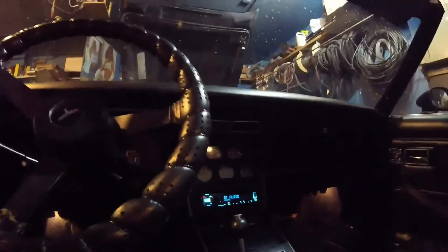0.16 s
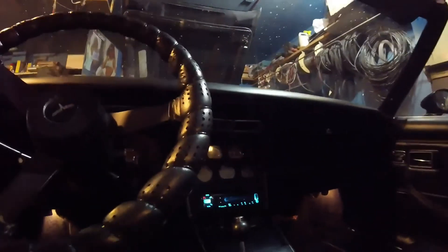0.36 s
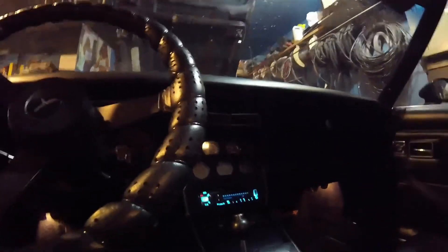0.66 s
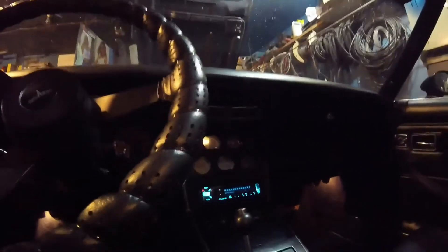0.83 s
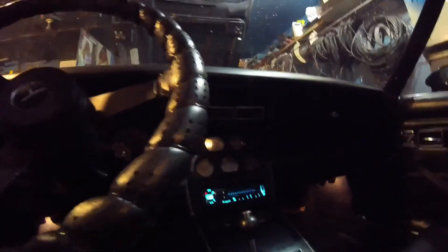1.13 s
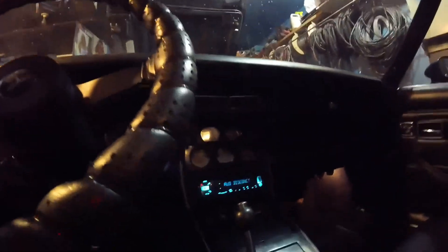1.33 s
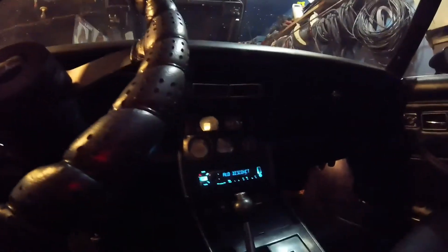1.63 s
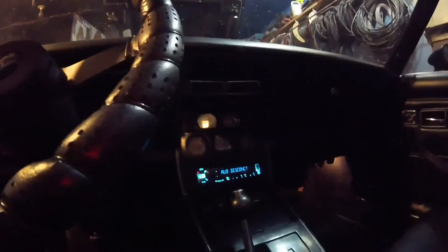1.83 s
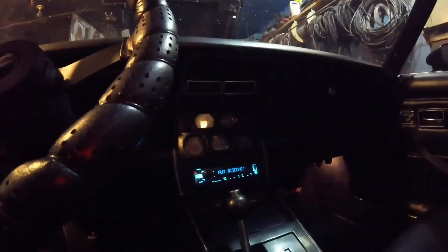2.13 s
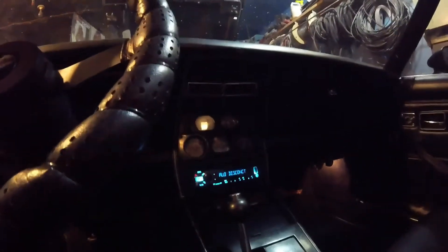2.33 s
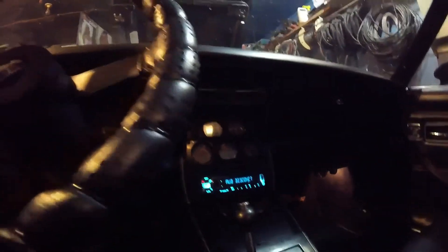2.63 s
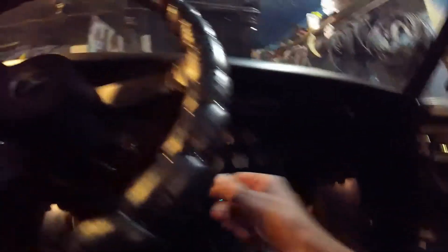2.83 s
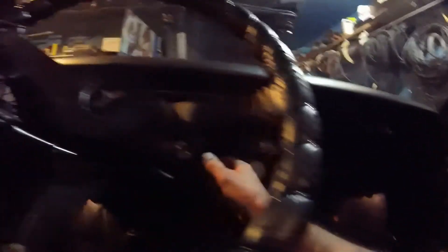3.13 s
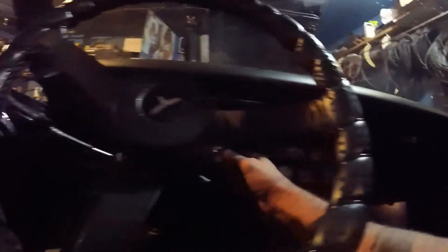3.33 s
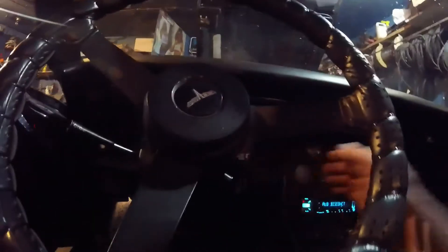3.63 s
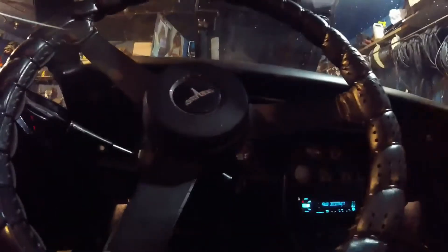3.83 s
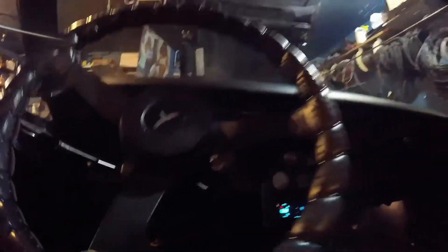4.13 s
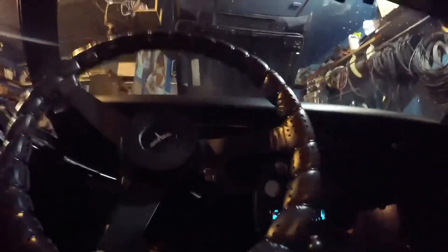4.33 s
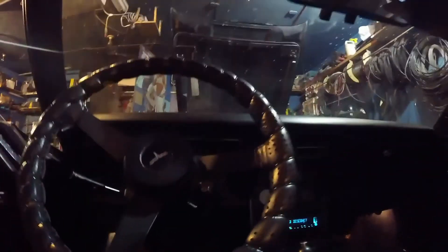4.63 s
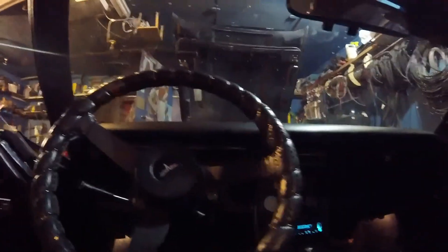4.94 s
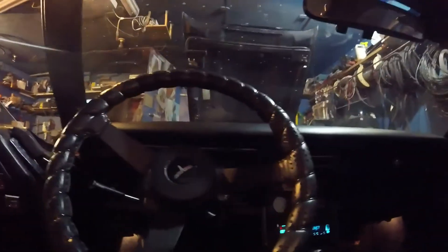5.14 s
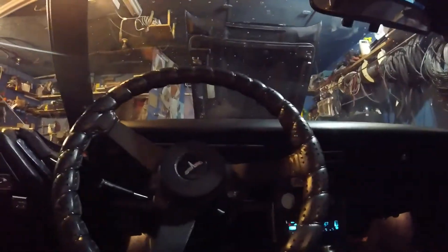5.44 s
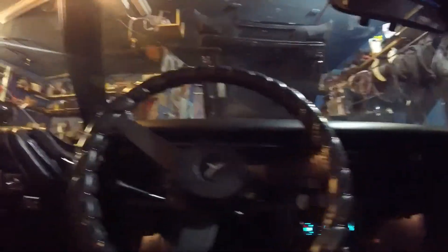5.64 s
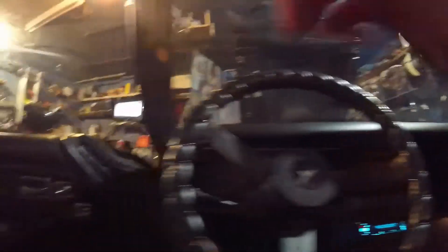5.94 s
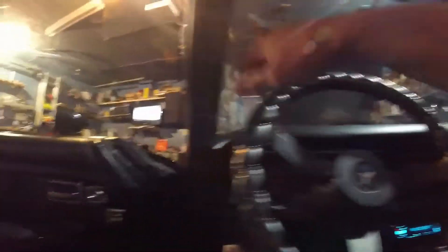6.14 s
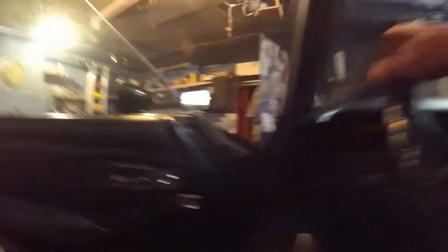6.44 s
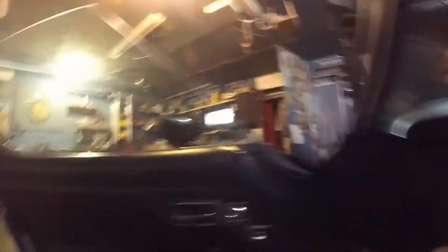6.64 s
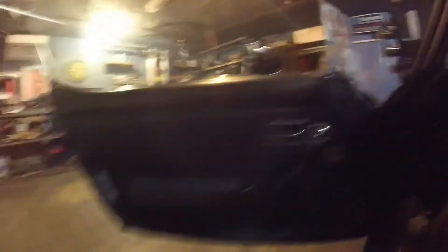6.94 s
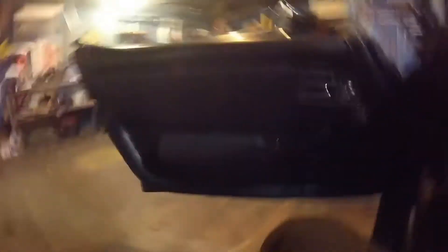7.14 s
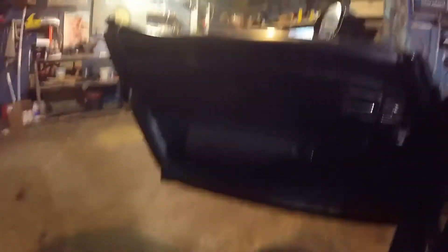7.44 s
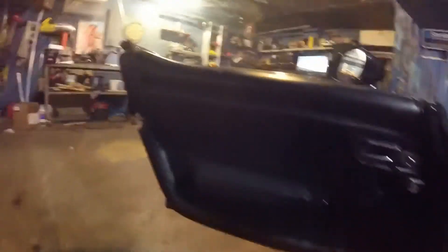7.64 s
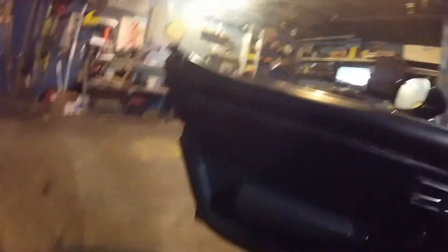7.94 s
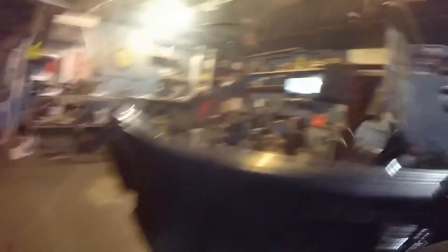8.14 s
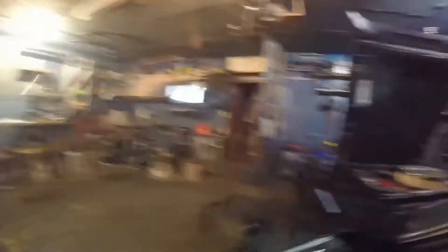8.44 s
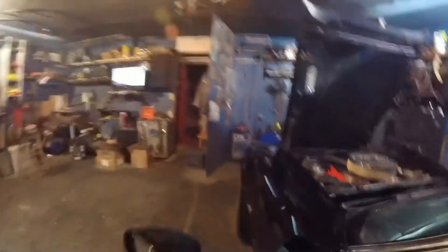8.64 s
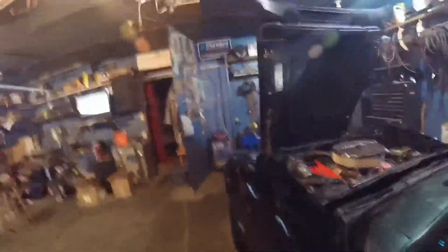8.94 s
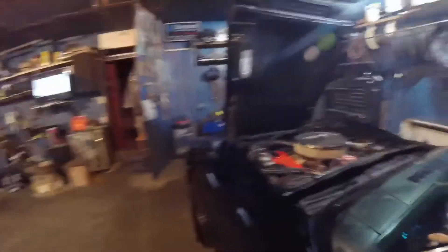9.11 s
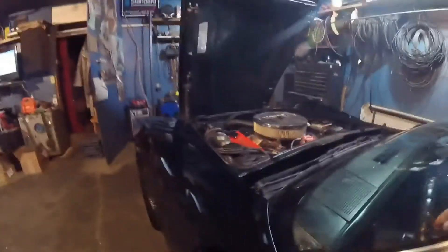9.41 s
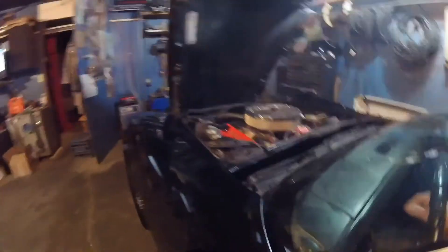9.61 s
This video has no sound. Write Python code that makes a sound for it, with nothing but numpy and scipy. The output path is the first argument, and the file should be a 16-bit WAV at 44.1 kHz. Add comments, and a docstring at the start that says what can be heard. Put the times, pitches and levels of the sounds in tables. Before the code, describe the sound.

Steady low engine rumble with uneven misfiring throbs booms in a car cabin, then gives way to rushing fan noise as the listener climbs out.

```python
"""Cold V8 at fast idle

A cold V8 runs at about 1320 rpm in a garage, heard first from the driver's seat, where the firing rate booms.
In spells one cylinder misses on every other cycle: the boom, a sine at the firing rate, lopes and the body thumps.
Random pulses, one per firing, rumble under sine exhaust orders; shaped noise makes the block, fan and carburettor.
The microphone works its way out past the open door; near the end the boom falls away and the fan grows."""
import sys
import numpy as np
from scipy import signal
from scipy.fft import rfft, irfft, next_fast_len
from scipy.io import wavfile
from scipy.ndimage import uniform_filter1d, minimum_filter1d

SR = 44100
rng = np.random.default_rng(int(sys.argv[2]) if len(sys.argv) > 2 else 0)


def file_out(sig):
    """Save sig as 16-bit WAV at sys.argv[1]."""
    # one column per channel
    cols = np.atleast_2d(sig).T
    # limit, then scale
    lim = np.clip(cols, -1, 1)
    pcm = np.round(lim * 32767).astype(np.int16)
    wavfile.write(sys.argv[1], SR, pcm)


N = 430857

# Levels below are taken before the trims in the functions; responses are relative, as their output is set to rms 1.
# Engine speed, hunting up and down and sinking a little: start_s, firing_rate_hz
SPEED_CURVE = [(0.0, 88.6), (0.4, 90.2), (0.7, 90.4), (1.0, 89.1), (1.2, 91.0), (1.45, 87.3), (1.8, 90.8),
               (2.1, 88.6), (2.35, 88.3), (2.8, 90.3), (3.0, 87.3), (3.15, 89.8), (3.35, 87.5), (3.6, 90.2),
               (3.8, 88.2), (4.1, 88.2), (4.33, 86.3), (4.55, 89.0), (4.8, 89.4), (4.95, 86.6), (5.2, 87.2),
               (5.45, 90.0), (5.72, 85.4), (6.25, 88.6), (6.55, 88.5), (6.85, 85.7), (7.05, 88.2),
               (7.25, 86.8), (7.6, 88.8), (7.9, 86.6), (8.2, 87.4), (8.35, 85.7), (8.6, 86.7), (9.0, 85.7),
               (9.6, 87.4), (9.77, 87.0)]
# Way out of the car (0 seat, 1/3 door sill, 2/3 behind the open door, 1 engine bay): start_s, way_out_0_to_1
MIC_PATH = [(0, 0), (3, 0), (5, 0.2), (6.5, 0.33), (7.2, 0.8), (8.2, 0.69), (8.7, 0.84), (9.3, 0.95)]
# Strength of each cylinder's pulse, in firing order: level_db
CYLINDER_LEVELS = [-7, -5, -5, -7, -8.5, -6, -3.5, -7]
FIRST_CYLINDER = 6  # place in the firing order at the start

# Brief swells in the midrange rush: peak_s, length_s, centre_hz, width_hz, level_db
RUSH_SWELLS = [(0.3, 0.89, 1307, 160, -43.5), (0.7, 1.5, 412, 25, -44), (5.92, 0.25, 1250, 300, -41),
               (6.135, 0.07, 380, 150, -35), (6.25, 0.37, 515, 45, -38), (6.563, 0.074, 1420, 200, -41.5),
               (6.704, 0.13, 650, 800, -34), (6.915, 0.12, 1380, 300, -39.5), (8.52, 0.15, 450, 400, -41),
               (9.686, 0.11, 1260, 350, -33)]
# Rush from the engine bay; the hiss follows the fan: start_s, fan_db, air_cleaner_db
BAY_LEVELS = [(0, -34, -49), (0.25, -38.5, -43), (1.1, -39, -43.5), (1.45, -41, -43.5), (3, -42, -45.5),
              (4.1, -40, -44.5), (4.7, -38.5, -42.5), (6.8, -37.5, -40.5), (7.2, -40.5, -41.5),
              (8.2, -40, -46.5), (9.1, -34, -38), (9.77, -31, -33.5)]
# Tone of fan and belts: pitch_hz, cabin_db, outside_db
FAN_RESPONSE = [(200, -3.5, -5), (716, 1.5, 3.5), (950, 5.5, 0), (1500, 1.5, 2), (1890, -1.5, 0),
                (2240, 0, 1), (3080, -4, -3), (4420, -7.5, -6.7), (5600, -9.5, -7), (6050, -12, -11),
                (6870, -11.5, -12.5), (7900, -18, -18), (8870, -20, -20), (12200, -37.5, -38.5)]
# Narrow air cleaner resonances: pitch_hz, width_hz (of one filter pass), level_db
CLEANER_RESONANCES = [(1148, 168, 7), (1250, 200, 6.5)]
CARBURETTOR_HZ, CARBURETTOR_WIDTH_HZ = 6520, 440
HUNT_RUSH_DB_PER_HZ = 0.1  # the bay gets louder and softer as the idle hunts
# Thud of the block: start_s, level_db
BLOCK_LEVEL = [(0, -32), (1.5, -36), (2.8, -37.5), (5.3, -33.5), (6.7, -35.5), (7.3, -36), (8.2, -35),
               (8.5, -31.5), (9.77, -28.5)]
# Ring of block and bonnet: pitch_hz, seat_db, sill_db, behind_door_db, bay_db
BLOCK_RESPONSE = [(150, -7, -6, -11, -17), (218, -1, -1, 3.5, 0.5), (267, 4, 3.5, 0, 8),
                  (310, -4.5, -1.5, -6, 4.5), (352, 2, 3.5, 1, 3), (398, -1, 1, -4, 1),
                  (460, -2, -3.5, 4, 0.5), (533, 2.5, 1, -2.5, -5), (606, -3, -5.5, -2, -7),
                  (700, -6, -6.5, -7.5, -2), (855, -13, -11.5, -8, -10), (1490, -18, -15.5, -18.5, -22),
                  (5000, -54, -56.5, -56, -62)]

# Half-rate drone, where the two banks alternate: start_s, level_db
DRONE_LEVEL = [(0, -34), (0.55, -20), (0.9, -28), (1.45, -21), (2.0, -29.5), (2.65, -20), (2.8, -31),
               (3.3, -24.5), (4.4, -21), (4.55, -28), (4.75, -26), (5.2, -34), (6.6, -29.5), (7.2, -39),
               (9.77, -40.5)]
# Misses of a cold cylinder, often on every other cycle: dip_s, boom_lost_0_to_1, thump_db
MISS_EVENTS = [(0.09, 0.1, -11), (0.225, .45, -26), (0.445, 0.67, -6), (0.585, 0.4, -24), (0.77, 0.77, -20),
               (0.951, 0.3, -24), (1.115, 0.66, -24), (1.309, 0.73, -16), (1.736, .4, -24),
               (1.916, 0.27, -25), (2.227, 0.2, -10), (2.588, 0.3, -12), (2.856, 0.35, -14),
               (3.17, .75, -25), (3.359, 0.53, -16), (3.532, 0.8, -29), (3.718, 0.57, -13),
               (3.899, 0.63, -22), (4.04, 0.47, -15), (4.215, 0.52, -15), (4.466, 0.4, -26),
               (4.571, 0.74, -13), (4.819, 0.6, -22), (4.925, 0.3, -11), (5.11, 0.4, -21),
               (5.37, 0.65, -22), (5.54, 0.4, -22), (5.691, 0.1, -13), (5.959, 0.76, -14),
               (6.174, 0.75, -17), (6.369, 0.8, -16), (6.748, 0.16, -19), (6.847, 0, -26), (7.033, 0, -25),
               (7.217, 0.33, -26), (7.47, .65, -26), (7.641, 0.33, -24), (7.805, 0.57, -26),
               (8.008, 0.47, -29), (8.196, 0.58, -26), (8.396, 0.34, -26), (8.56, 0.5, -30)]
SAG_S = 0.028  # half the length of the dip that a miss leaves in the boom
# The body rocks just before the boom is weakest
THUMP_HZ, THUMP_RISE_S, THUMP_LEAD_S = 40.7, 0.011, 0.014
MISS_SCATTER = 0.063  # typical share of the boom by which a cycle differs

# Shudder of the car body: start_s, level_db
SHUDDER_LEVEL = [(0, -15), (1.3, -16.5), (2, -26), (3.0, -20), (3.9, -21), (4.7, -12), (5.3, -14.5),
                 (6.5, -13.5), (7.2, -21.5), (8.6, -23.5), (9.2, -17), (9.77, -17.5)]
# Car body, an even rumble in the open garage: pitch_hz, cabin_db, outside_db
BODY_RESPONSE = [(10, -19.5, -15), (19, -3, 3), (30, 2, 5.5), (43, 7.5, 2.5), (56, 1, 7), (75, -20, 1.5),
                 (200, -76.5, -46), (1000, -120, -110)]
# Cabin air driven by uneven firings: pitch_hz, level_db
CABIN_RESPONSE = [(45, -27.5), (58, -10), (66, 3), (74, 9.5), (84, 5.5), (92, -10), (100, -10), (125, -22),
                  (300, -75)]
CABIN_DB = -13.6  # below the smoothed boom level
# Throb of the exhaust pipes: start_s, level_db
THROB_LEVEL = [(0, -26.5), (1.5, -28.5), (2.8, -29.5), (5.3, -26.5), (6.1, -27), (6.7, -23.5), (8.7, -29.5),
               (9.77, -26)]
# Exhaust pipes: pitch_hz, seat_db, sill_db, behind_door_db, bay_db
PIPE_RESPONSE = [(70, -32, -33.5, -29, -29), (103, -2.5, -3, -4, -4), (119, 1, -0.5, 3.5, 3),
                 (152, 4, 5.5, 6, 3), (176, -3, 0, 3.5, -0.5), (209.6, -0.5, -1, -5, 0),
                 (220, -21, -18.5, -15, -16), (398, -31, -32.5, -31, -40), (1000, -65, -64, -66.5, -67)]
# Exhaust lines, relative to the throb: multiple_of_cycle (eight firings), seat_db, sill_db, behind_door_db, bay_db
EXHAUST_ORDERS = [(2, -11.5, -10.5, -17, -14), (3, -8, -5.5, -9, -2.5), (6, 6.5, 2.5, 4.5, -5.5),
                  (7, 5, 2, 0.5, -2), (9, -16, -12, -6.5, 2), (10, 1, 5, 0, 12), (13, -2, 0.5, -2.5, -3),
                  (14, -11, -5.5, -7, 5.5), (16, -3.5, -8.5, -10, -18), (18, -1.5, -8.5, -16, -15),
                  (21, -17.5, -20.5, -20, -21), (24, -9.5, -13, -23.5, -11), (26, -22, -18, -27, -6.5),
                  (29, -24, -23, -21, -8), (33, -20.5, -14.5, -19, -18), (37, -14, -17, -26, -16),
                  (45, -22, -22, -21.5, -16), (47, -20, -22, -26.5, -20)]
# Boom of the firing rate: start_s, level_db
BOOM_LEVEL = [(0.0, -11), (1.6, -10.5), (2.15, -10), (2.9, -13), (4.1, -10), (4.8, -13), (5.5, -12),
              (6.1, -12), (6.9, -11.5), (8.2, -8.5), (8.55, -13), (8.85, -25), (9.5, -27), (9.77, -27)]

LOW_CUT_HZ, TOP_HZ = 6, 12000  # range of the microphone


def undb(db):
    """Decibels to gain."""
    return 10 ** (np.asarray(db) / 20)


def unit(x):
    """Scale to rms 1."""
    return x / np.sqrt(np.mean(x ** 2))


def curves(table):
    """Each column of a time table, sample by sample."""
    s, *columns = np.transpose(table)
    return [np.interp(np.arange(N) / SR, s, column) for column in columns]


def walk(rate_hz):
    """Random levels, each held for 1 / rate_hz seconds and slewed twice; rms 1."""
    hold = int(SR / rate_hz)
    held = np.repeat(rng.standard_normal(N // hold + 1), hold)
    slewed = uniform_filter1d(uniform_filter1d(held, hold), hold)
    return unit(slewed[:N])


def colour(x, points):
    """Shape the spectrum of x by a response of (Hz, dB) points; rms 1."""
    hz, db = np.transpose(points)
    size = next_fast_len(N + SR)
    f = np.maximum(np.fft.rfftfreq(size, 1 / SR), 1)
    gain = undb(np.interp(np.log(f), np.log(hz), db))
    return unit(irfft(rfft(x, size) * gain, size)[:N])


def heard(x, table, outside):
    """Crossfade from one place's response to the next as the microphone leaves the car."""
    table = np.array(table)
    shares = np.eye(table.shape[1] - 1)
    places = np.linspace(0, 1, len(shares))
    out = np.zeros(N)
    for k, share in enumerate(shares):
        out += np.interp(outside, places, share) * colour(x, table[:, [0, k + 1]])
    return out


def resonance(x, hz, width_hz):
    """A band-pass resonance applied twice, for steep skirts; rms 1."""
    b, a = signal.iirpeak(hz, hz / width_hz, fs=SR)
    return unit(signal.lfilter(b, a, signal.lfilter(b, a, x)))


def scatter(count=1024):
    """One random value for each firing or cycle."""
    return rng.standard_normal(count)


def uneven_pulses(firings):
    """Each firing's random departure from the average, as a single-sample pulse."""
    at = np.flatnonzero(np.diff(np.floor(firings)))
    out = np.zeros(N)
    out[at] = scatter()[:len(at)]
    return out


def puffs(firings, decay, steady, scatter_db):
    """Noise that surges at each firing and decays over a share of the period, on a steady part."""
    index = firings.astype(int)
    cylinder_db = np.array(CYLINDER_LEVELS)[index % len(CYLINDER_LEVELS)]
    size = undb(cylinder_db + scatter_db * scatter()[index])
    surge = size * np.exp(-(firings % 1) / decay)
    return rng.standard_normal(N) * (steady + surge)


def swells():
    """Bands of noise rise and sink briefly in the midrange of the rush."""
    t = np.arange(N) / SR
    out = np.zeros(N)
    for s, length, hz, width, db in RUSH_SWELLS:
        envelope = np.exp(-(2 * (t - s) / length) ** 2)
        out += resonance(rng.standard_normal(N), hz, width) * undb(db) * envelope
    return out


def fan(firings, outside):
    """Fan and belts push out a broad rush of air that pulses only slightly with the firings."""
    return heard(puffs(firings, decay=1.2, steady=3.2, scatter_db=3.5), FAN_RESPONSE, outside)


def carburettor(firings, flutter_db):
    """Air squeezes past the nearly shut throttle plates in a narrow hiss."""
    suction = puffs(firings, decay=0.82, steady=0.9, scatter_db=5.0) * undb(flutter_db * walk(11))
    return resonance(suction, CARBURETTOR_HZ, CARBURETTOR_WIDTH_HZ)


def air_cleaner(firings, flutter_db):
    """Each intake stroke rings the fluttering resonances of the air cleaner."""
    intake = puffs(firings, decay=0.9, steady=1.6, scatter_db=2.5)
    out = np.zeros(N)
    for hz, width, db in CLEANER_RESONANCES:
        out += undb(db + flutter_db * walk(11)) * resonance(intake, hz, width)
    return unit(out)


def block(firings, outside):
    """Each firing thuds through the block and bonnet."""
    return heard(puffs(firings, decay=1.0, steady=0.78, scatter_db=5.0), BLOCK_RESPONSE, outside)


def engine_bay(firings, outside, block_db=-0.5, fan_db=1.03, cleaner_db=-1.0, hiss_db=-16,
               flutter_db=1.1, draught_db=0.52):
    """Fan rush and carburettor hiss waver as one draught beside the air cleaner and the block."""
    fan_level, cleaner_level = curves(BAY_LEVELS)
    block_level, = curves(BLOCK_LEVEL)
    air = undb(fan_db) * fan(firings, outside) + undb(hiss_db) * carburettor(firings, flutter_db)
    air *= undb(fan_level + draught_db * walk(9))
    cleaner = undb(cleaner_level + cleaner_db) * air_cleaner(firings, flutter_db)
    thud = undb(block_level + block_db) * block(firings, outside)
    return air + cleaner + thud


def drone(firings, lumpy_db=2.5):
    """The two banks alternate in a half-rate sine that comes in uneven lumps."""
    level, = curves(DRONE_LEVEL)
    return np.sqrt(2) * np.sin(np.pi * firings) * undb(level + lumpy_db * walk(14))


def thumps():
    """Each miss rocks the engine on its mounts, and the body answers with a short low thump."""
    age = np.arange(SR // 2) / SR
    envelope = age / THUMP_RISE_S * np.exp(1 - age / THUMP_RISE_S)
    ring = envelope * np.sin(2 * np.pi * THUMP_HZ * age)
    kicks = np.zeros(N)
    for s, _, db in MISS_EVENTS:
        kicks[int((s - THUMP_LEAD_S) * SR)] = undb(db)
    return signal.fftconvolve(kicks, ring)[:N]


def lope(firings):
    """Gain of the boom: it sags and recovers at each miss, and varies a little in every cycle."""
    t = np.arange(N) / SR
    cycle = firings / len(CYLINDER_LEVELS)
    gain = 1 - MISS_SCATTER * scatter()[cycle.astype(int)] * np.sin(np.pi * cycle) ** 2
    for s, share, _ in MISS_EVENTS:
        near = np.abs(t - s) < 0.5
        gain[near] *= 1 - share * np.exp(-((t[near] - s) / SAG_S) ** 2)
    return gain


def exhaust_lines(firings, outside, fade_db=0.66, sway_rad=0.011, waver=0.2):
    """The banks fire unevenly, so wavering sines stand at multiples of the cycle and change with place."""
    cycle = firings / len(CYLINDER_LEVELS)
    out = np.zeros(N)
    for multiple, *places_db in EXHAUST_ORDERS:
        drift, flutter, fade = walk(14), walk(12), walk(2)
        # the same small phase sway blurs each line
        phase = 2 * np.pi * multiple * cycle + sway_rad * drift
        place_db = np.interp(outside, np.linspace(0, 1, len(places_db)), places_db)
        gain = undb(place_db + fade_db * fade) * (1 + waver * flutter)
        # pipes and walls delay each line differently
        out += gain * np.sin(phase + rng.uniform(0, 2 * np.pi))
    return np.sqrt(2) * out


def exhaust(firings, outside, boom_db=0, lines_db=-5, shudder_db=-6, pipes_db=-4.0):
    """A loping boom and its side lines, over the rumble of firings that differ in strength."""
    boom_level, = curves(BOOM_LEVEL)
    shudder_level, = curves(SHUDDER_LEVEL)
    throb_level, = curves(THROB_LEVEL)
    boom = np.sqrt(2) * np.sin(2 * np.pi * firings) * lope(firings) * undb(boom_level + boom_db)
    lines = exhaust_lines(firings, outside) * undb(throb_level + lines_db)
    # uneven firings shake the body, the cabin air and the pipes; the cube keeps the cabin tone longer
    shudder = heard(uneven_pulses(firings), BODY_RESPONSE, outside ** 3)
    shudder *= undb(shudder_level + shudder_db)
    cabin = colour(uneven_pulses(firings), CABIN_RESPONSE)
    cabin *= undb(uniform_filter1d(boom_level, SR) + CABIN_DB)
    pipes = heard(uneven_pulses(firings), PIPE_RESPONSE, outside) * undb(throb_level + pipes_db)
    return boom + lines + shudder + cabin + pipes


def scene():
    """One engine speed drives the bay, the drone and the exhaust; thumps and swells come at set times."""
    firing_hz, = curves(SPEED_CURVE)
    hunt_hz = firing_hz - uniform_filter1d(firing_hz, SR)
    outside = np.clip(curves(MIC_PATH)[0], 0, 1)
    firings = FIRST_CYLINDER + np.cumsum(firing_hz) / SR  # running count of firings
    bay = engine_bay(firings, outside) * undb(HUNT_RUSH_DB_PER_HZ * hunt_hz)
    mix = swells() + bay + drone(firings) + thumps() + exhaust(firings, outside)
    return mix[None]


def record(dry):
    """A limiter holds down the strongest peaks; the microphone loses the deepest lows and the top."""
    ceiling, hold = 0.75, SR // 40  # full scale 1; samples
    gain = np.minimum(1, ceiling / (np.abs(dry) + 1e-9))
    gain = uniform_filter1d(minimum_filter1d(gain, hold), hold)
    low_cut = signal.butter(1, LOW_CUT_HZ, "high", fs=SR, output="sos")
    top_cut = signal.ellip(8, 0.2, 70, TOP_HZ, fs=SR, output="sos")
    return signal.sosfilt(top_cut, signal.sosfilt(low_cut, gain * dry))


dry = scene()
out = record(dry)
file_out(out)
```